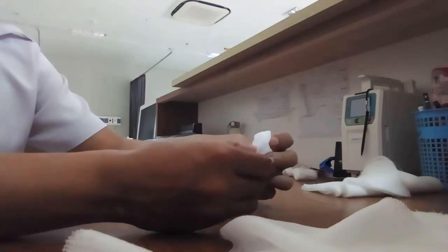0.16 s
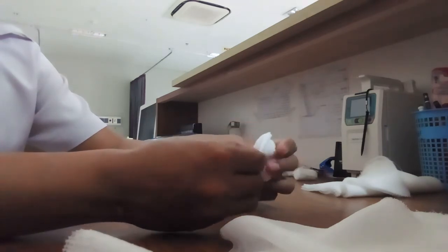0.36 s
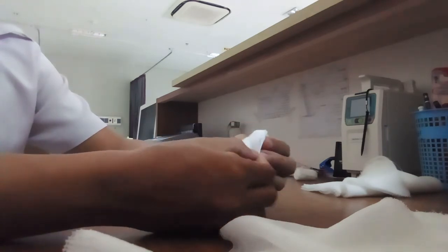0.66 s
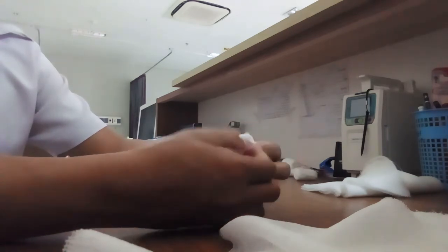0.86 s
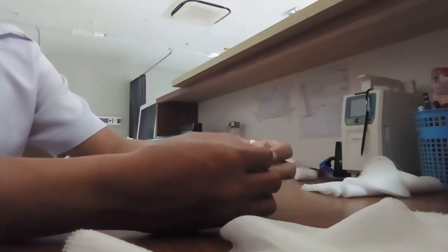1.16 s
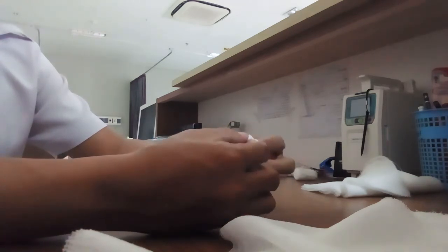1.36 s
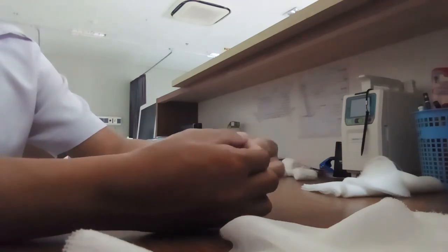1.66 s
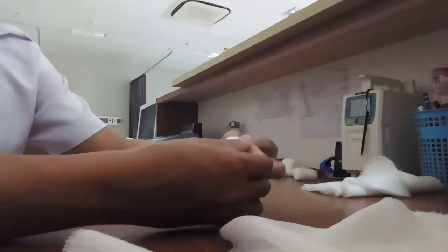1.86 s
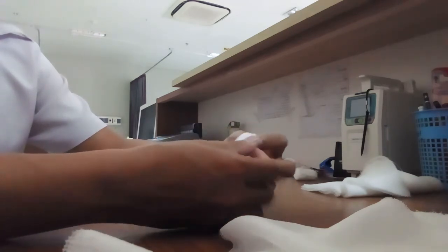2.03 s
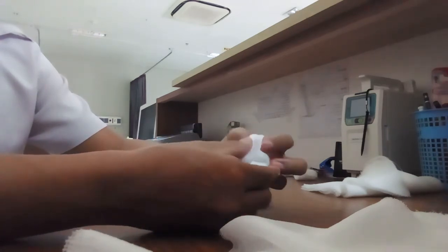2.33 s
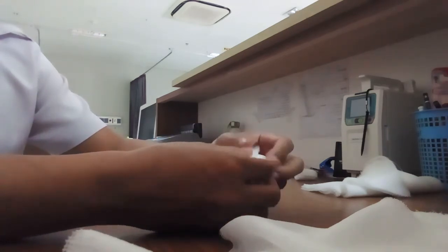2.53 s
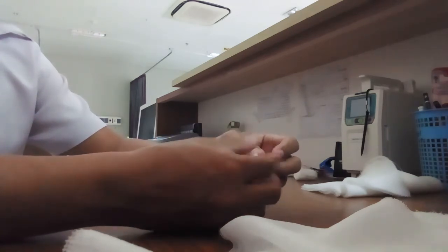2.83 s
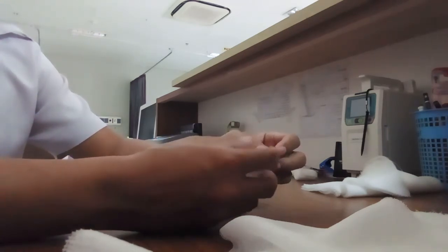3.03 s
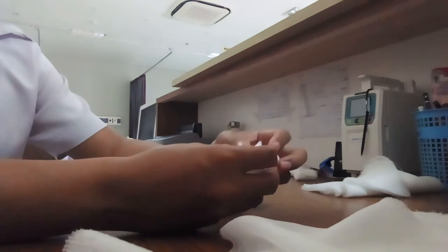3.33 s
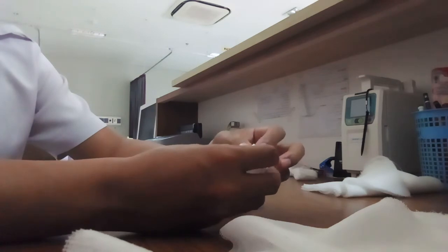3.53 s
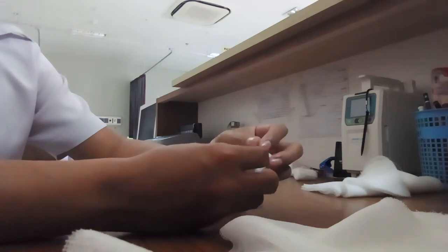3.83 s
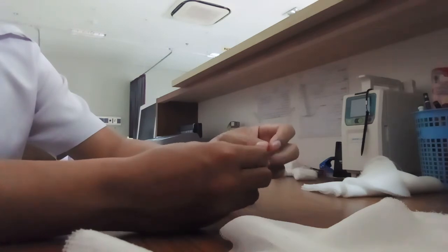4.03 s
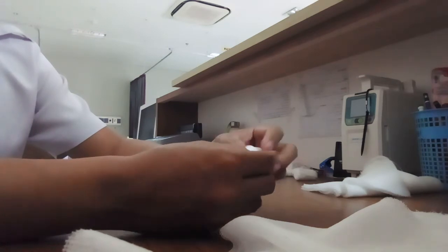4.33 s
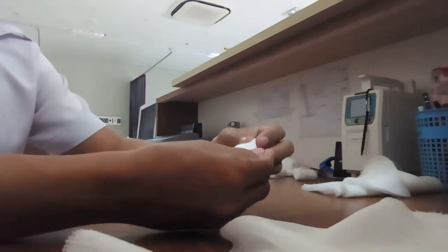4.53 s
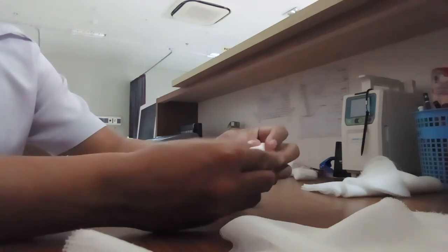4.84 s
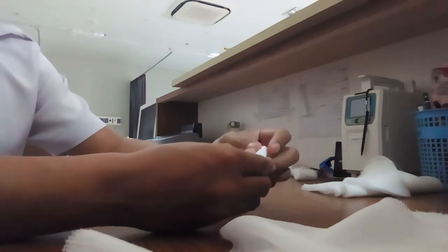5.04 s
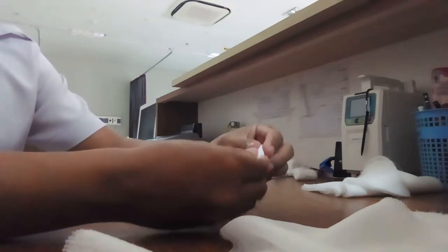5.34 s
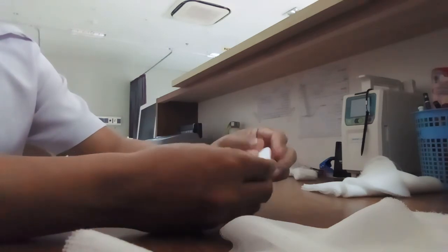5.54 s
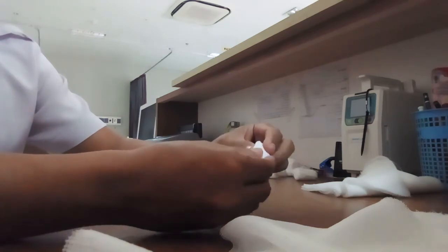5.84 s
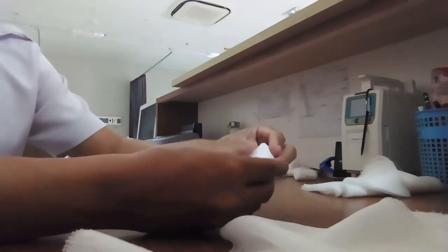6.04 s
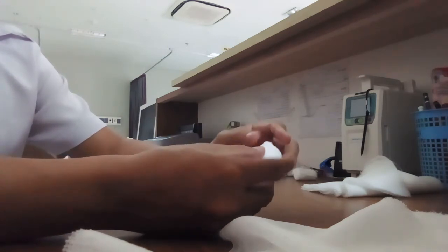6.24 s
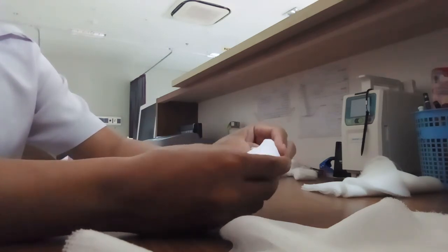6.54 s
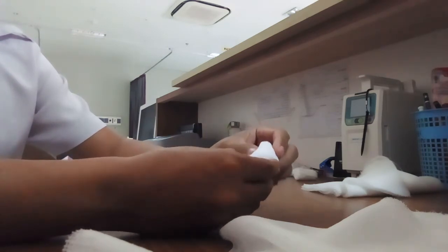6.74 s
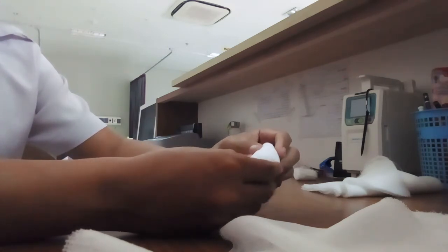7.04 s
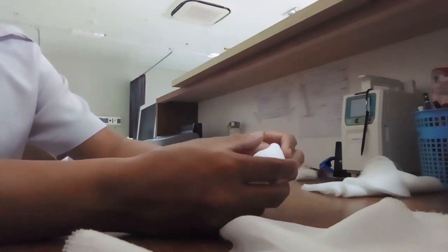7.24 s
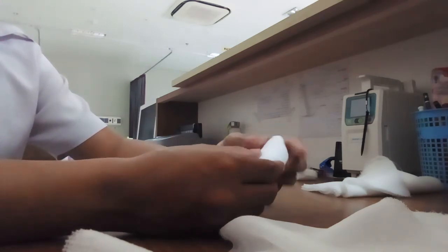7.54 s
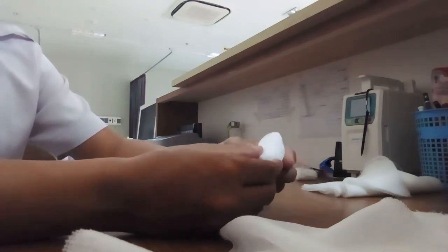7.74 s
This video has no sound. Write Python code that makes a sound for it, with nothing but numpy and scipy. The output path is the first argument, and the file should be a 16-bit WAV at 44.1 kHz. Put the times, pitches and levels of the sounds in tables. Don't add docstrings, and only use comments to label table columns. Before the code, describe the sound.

A ceiling air conditioner rushes and hums low and steady in a closed office, with one soft fingertip tap on a desk.

```python
import sys
import numpy as np
from scipy import signal
from scipy.fft import rfft, irfft
from scipy.io import wavfile

SR = 44100
rng = np.random.default_rng(int(sys.argv[2]) if len(sys.argv) > 2 else 0)


def convert_level_to_amplitude(level_db):
    exponent = np.asarray(level_db, float) / 20
    return 10 ** exponent


def put_to_file(sound):
    columns = np.atleast_2d(sound).T
    safe = np.clip(columns, -1, 1)
    whole_steps = np.round(safe * 32767)
    wavfile.write(sys.argv[1], SR, whole_steps.astype(np.int16))


N = 347366
TIME_S = np.arange(N) / SR


def in_time(rows):
    s, *columns = np.transpose(rows)
    return [np.interp(TIME_S, s, column) for column in columns]


def rms_one(x):
    return x / np.sqrt(np.mean(x ** 2) + 1e-20)


def drift(rate):
    pole = np.exp(-80 * np.pi * rate / SR)
    sparse = rng.standard_normal(N // 40 + 2002)
    slow = signal.lfilter([1], [1, -2 * pole, pole * pole], sparse)[2000:]
    return np.interp(np.arange(N) / 40, np.arange(len(slow)), rms_one(slow))


def coloured_noise(spectrum, modes=()):
    hz = np.maximum(np.arange(N // 2 + 1) * SR / N, 1)
    point_hz, point_db = np.transpose(spectrum)
    level_db = np.interp(np.log(hz), np.log(point_hz), point_db, left=-90, right=-90)
    for mode_hz, width_hz, lift_db in modes:
        level_db = level_db + lift_db / (1 + (2 * (hz - mode_hz) / width_hz) ** 2)
    white = rfft(rng.standard_normal(N))
    return rms_one(irfft(white * convert_level_to_amplitude(level_db), N))


def swells(rows):
    half_width_s = 0.062
    return sum(lift_db * np.exp(-.5 * ((TIME_S - s) / half_width_s) ** 2) for s, lift_db in rows)


def drone(pitch_hz, level_db, wobble_hz, flutter_db, overtone_db=-60):
    phase = 2 * np.pi * (np.cumsum(pitch_hz + wobble_hz * drift(6.4)) / SR + rng.random())
    tone = np.sin(phase) + convert_level_to_amplitude(overtone_db) * np.sin(2 * phase)
    return np.sqrt(2) * convert_level_to_amplitude(level_db + flutter_db * drift(14)) * tone


# pitch_hz, level_db (per Hz)
HISS_SPECTRUM = [(2000, -29.5), (3500, -8), (6500, -5), (9000, -4.5), (12000, -3), (17000, -4)]


def microphone_hiss():
    return convert_level_to_amplitude(-79.5) * coloured_noise(HISS_SPECTRUM)


# pitch_hz, level_db (per Hz)
TYRE_SPECTRUM = [(500, -30), (800, 1.5), (1100, 0), (1500, -3), (1900, -20), (2400, -26.5), (3200, -39)]


def tyres(level_db):
    return convert_level_to_amplitude(level_db + 1.1 * drift(1.4)) * coloured_noise(TYRE_SPECTRUM)


def approach(nearest_s, half_s, pitch_hz, level_db, sag_hz_per_s=0):
    t = TIME_S - nearest_s
    return pitch_hz - sag_hz_per_s * t, level_db - 6 * np.minimum((t / half_s) ** 4, 20)


# nearest_s, half_length_s, pitch_hz, level_db
FAR_ENGINES = [
    (0.0, 0.45, 78.5, -45),
    (1.9, 1.6, 78.4, -51.5),
    (3.95, .4, 85, -46.5),
    (4.7, 0.46, 87, -45),
    (5.597, 0.25, 84.5, -47.5),
]
# nearest_s, half_length_s, pitch_hz, level_db
NEAR_ENGINE = (6.65, .68, 121.5, -43)
# peak_s, lift_db
NEAR_SURGES = [
    (6.22, 8),
    (6.55, 2.5),
    (6.86, 8),
    (7.2, 3),
]
# time_s, pitch_hz, level_db
IDLING_MOTOR = [
    (5.2, 51.6, -75),
    (5.5, 51.6, -59),
    (6.35, 51.7, -58),
    (6.55, 52, -50.5),
    (7.2, 52, -50.5),
    (7.95, 52.5, -48.5),
]


def engines():
    far = sum(drone(*approach(*row), wobble_hz=0.9, flutter_db=2.5) for row in FAR_ENGINES)
    pitch_hz, level_db = approach(*NEAR_ENGINE, sag_hz_per_s=6.5)
    level_db = level_db + swells(NEAR_SURGES)
    near = drone(pitch_hz, level_db, wobble_hz=.5, flutter_db=1.6, overtone_db=-13)
    idling = drone(*in_time(IDLING_MOTOR), wobble_hz=.2, flutter_db=.7)
    return far + near + idling


# start_s, level_db (at the start), pitch_hz, t60_s
DESK_MODES = [
    (2.1416, -19.5, 385, .03),
    (2.1422, -25.5, 570, .017),
    (2.1426, -33, 800, .012),
]


def tap():
    out = np.zeros(N)
    for start_s, level_db, pitch_hz, t60_s in DESK_MODES:
        t = np.maximum(TIME_S - start_s, 0)
        contact = np.sin(np.pi / 2 * np.minimum(t / .002, 1)) ** 2
        decay = convert_level_to_amplitude(level_db - 60 * t / t60_s)
        out -= decay * contact * np.sin(2 * np.pi * pitch_hz * t)
    return out


# time_s, pitch_hz, level_db (between swells)
HUM_CURVE = [(0.0, 103, -53.5), (1.0, 101.5, -45), (1.3, 106, -42), (2.4, 105.5, -44.5),
             (3.45, 98, -47.5), (3.7, 107.1, -48.5), (4.1, 108, -44), (4.6, 104, -43.5), (5.2, 95.5, -47),
             (6.4, 97.5, -43.5), (6.9, 96, -50), (7.2, 95.6, -56)]
# peak_s, lift_db
HUM_SWELLS = [(.3, 11), (.72, 6), (1.3, 9.5), (1.44, 4.5), (1.76, 4), (2.04, 4), (3.12, 7.5), (3.48, 8),
              (3.76, 9), (4.15, 6), (4.44, 9), (4.68, 5.5), (5.16, 6), (5.4, 2), (5.56, 7.5), (6.0, 5),
              (6.24, 3), (6.48, 2)]


def hum():
    pitch_hz, level_db = in_time(HUM_CURVE)
    return drone(pitch_hz, level_db + swells(HUM_SWELLS), wobble_hz=.5, flutter_db=2.06)


# pitch_hz, level_db (per Hz)
GRILLE_SPECTRUM = [(1700, -26.5), (2000, -0.5), (2180, -2), (2500, -12), (3200, -22.5)]


def grille(level_db):
    return convert_level_to_amplitude(level_db + 2.5 * drift(3)) * coloured_noise(GRILLE_SPECTRUM)


# pitch_hz, level_db (per Hz)
AIR_SPECTRUM = [(20, -40.5), (40, -25.5), (62, -16.5), (100, -7), (140, -10), (290, -16), (560, -20),
                (850, -23.5), (1250, -31), (1600, -40.5), (1850, -47.5), (3000, -58.5), (5500, -65.5),
                (8000, -83.5)]
# pitch_hz, width_hz, lift_db
ROOM_MODES = [(50, 6.5, 7), (95, 26.5, 3.5), (122.4, 12, 2.5), (166, 18, 6), (233.8, 20, 3.5),
              (265, 10, 0.5), (332, 12, 4), (365.3, 7, 4), (470, 53, 3.5), (800, 80, 0.5), (1530, 140, 1.5)]


def air(level_db):
    return convert_level_to_amplitude(level_db + 2.5 + 0.48 * drift(2)) * coloured_noise(AIR_SPECTRUM, ROOM_MODES)


def scene():
    burst_db, fade_s = 3.0, 1.86
    fade_db = burst_db * (np.exp(-(TIME_S / fade_s) ** 2) - 1)
    street = tyres(-54 + 2.28 * fade_db) + engines()
    hum_and_vent = hum() + grille(-74.5 + 1.4 * fade_db) + air(-42)
    return (street + tap() + hum_and_vent)[None]


def low_pass(x):
    return signal.sosfilt(signal.butter(12, 15740, fs=SR, output="sos"), x)


def record(dry):
    mix = dry + microphone_hiss()
    return low_pass(mix)


dry = scene()
out = record(dry)
put_to_file(out)
```